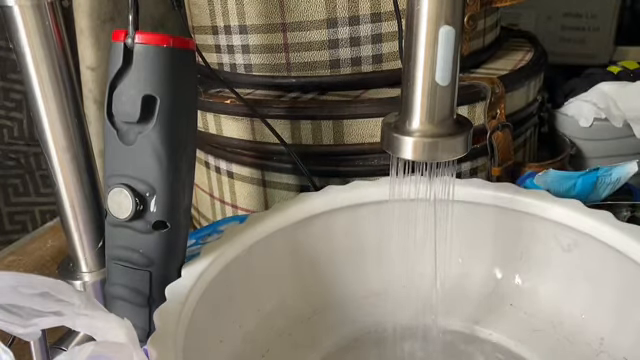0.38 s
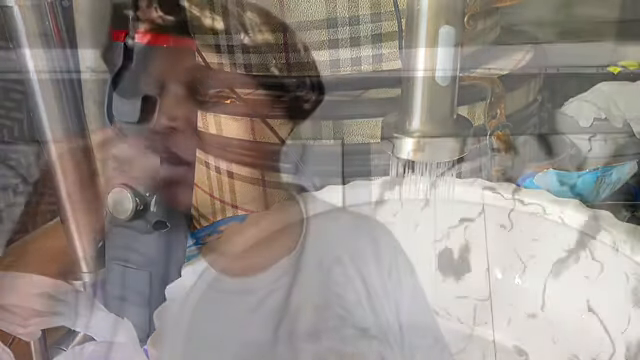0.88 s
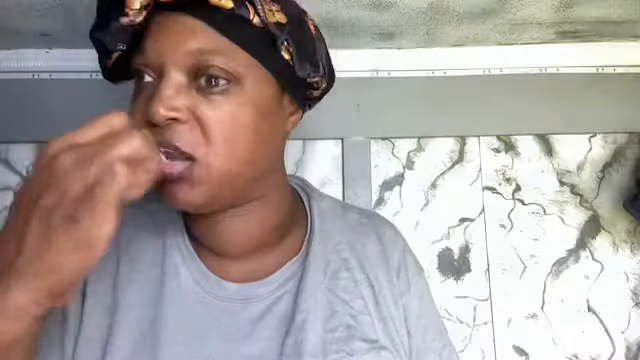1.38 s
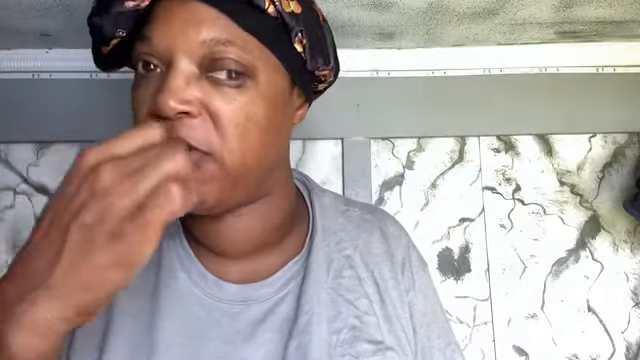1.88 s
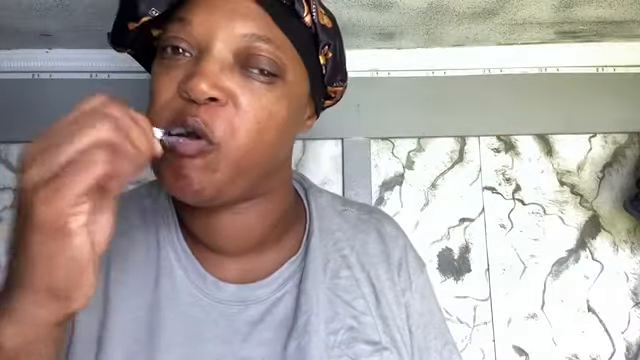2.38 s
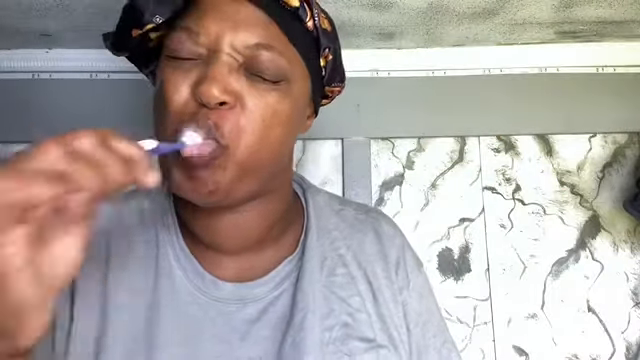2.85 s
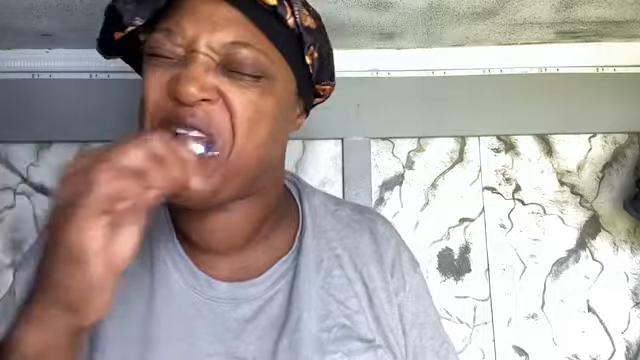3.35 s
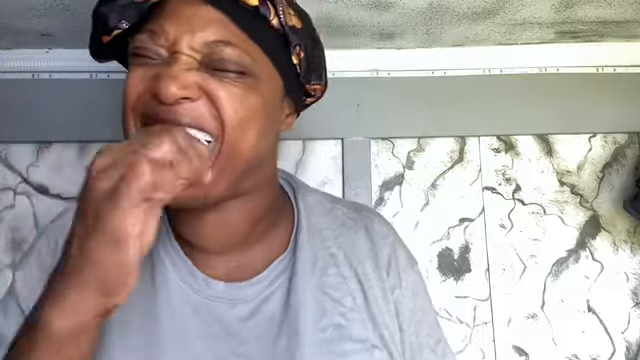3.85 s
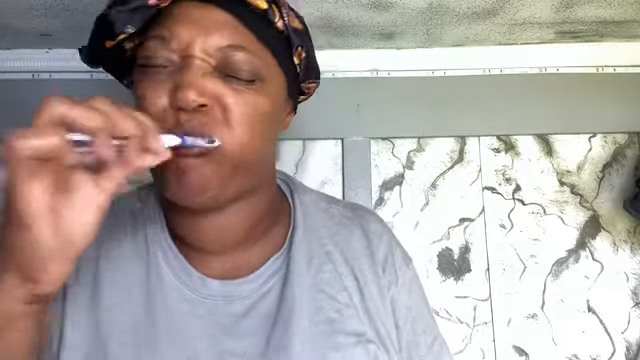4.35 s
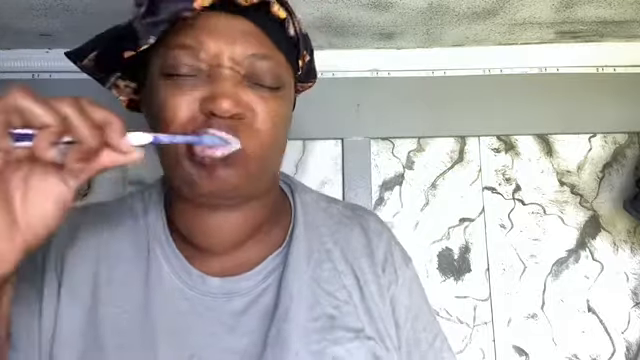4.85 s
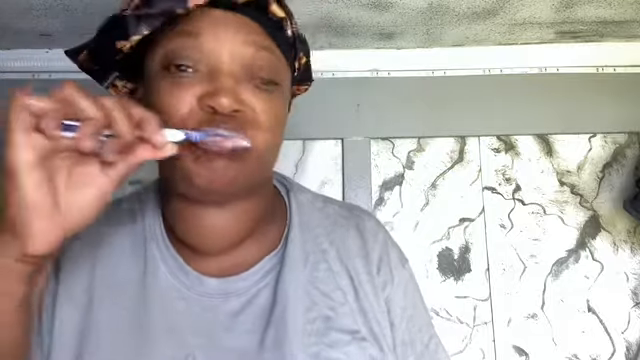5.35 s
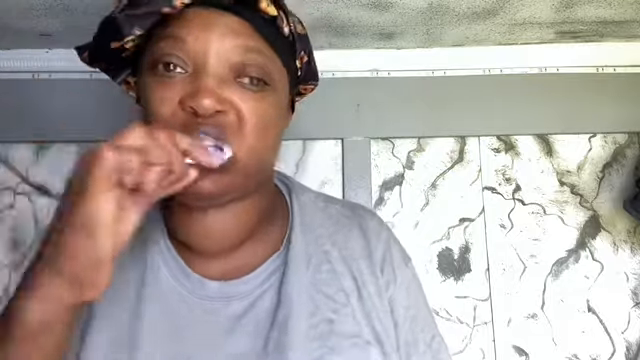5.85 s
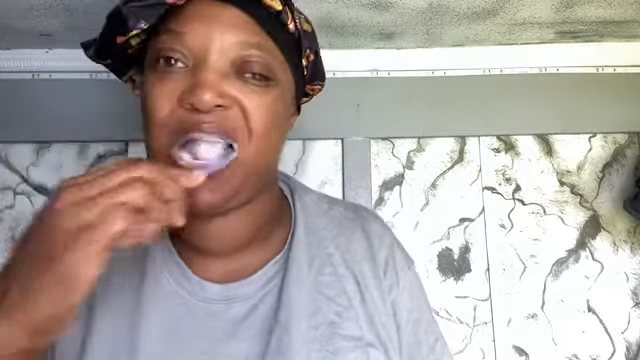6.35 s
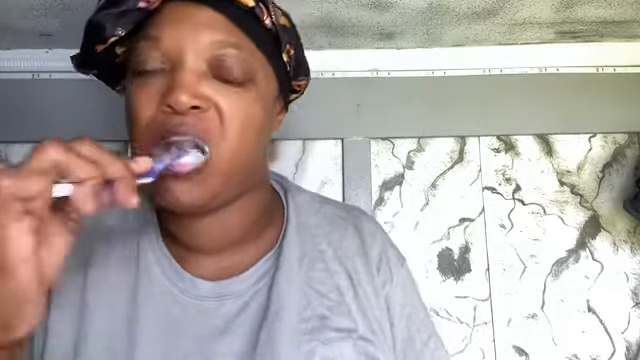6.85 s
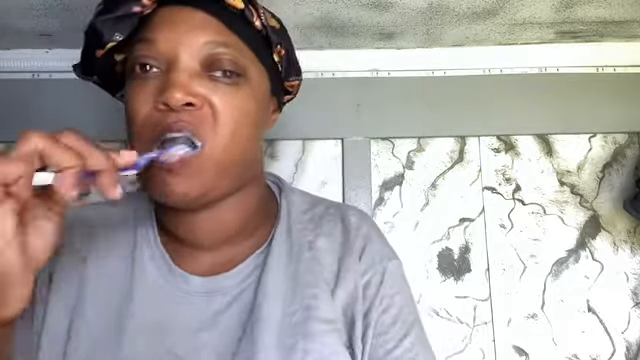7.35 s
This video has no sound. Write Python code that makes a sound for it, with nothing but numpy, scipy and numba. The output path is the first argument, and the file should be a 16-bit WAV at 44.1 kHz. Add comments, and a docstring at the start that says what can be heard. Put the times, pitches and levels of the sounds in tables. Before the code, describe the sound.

A spray tap patters and gurgles into a thin basin, fades after a second, then a toothbrush scrubs teeth in quick strokes over low rumble.

```python
"""A low rumble through the walls fills a cramped cabin throughout: noise swollen by the cabin's low modes.
At first a spray tap plays into a thin basin: spray grains, bubbles, big drops, a drumming bottom and a
low hum, likely the water pump. Brushing off to one side scrubs along, then the water ends and tooth
brushing takes over. Each stroke drags bristles over the teeth: dense slips hiss, ring in the teeth and
sound the mouth cavity, whose pitch follows the lips; knocks and scratches punctuate it."""
import sys
import numpy as np
from scipy import signal
from scipy.fft import rfft, irfft, next_fast_len
from scipy.io import wavfile
from numba import njit

SR = 44100
rng = np.random.default_rng(int(sys.argv[2]) if len(sys.argv) > 2 else 0)


def to_wav(s):
    """Save 16-bit WAV."""
    ch = np.atleast_2d(s).T  # columns
    pcm = np.round(np.clip(ch, -1, 1) * 32767)  # PCM
    wavfile.write(sys.argv[1], SR, pcm.astype(np.int16))


def ratio(d):
    """dB to gain"""
    e = np.asarray(d, float) / 20
    return 10 ** e


N = 340011


def rms_one(x):
    """Scales to rms 1."""
    return x / np.sqrt(np.mean(x ** 2) + 1e-20)


def in_time(s, values):
    """Reads a curve at every sample."""
    return np.interp(np.arange(N) / SR, s, values)


def at_hz(points, hz):
    """Reads a spectrum on a log-frequency axis."""
    points_hz, values = np.transpose(points)
    return np.interp(np.log(hz), np.log(points_hz), values)


def drift(rate_hz):
    """Slow chance with rms 1: noise through two equal real poles, run at SR / 40."""
    r = np.exp(-80 * np.pi * rate_hz / SR)
    white = rng.standard_normal(N // 40 + 2002)
    slow = signal.lfilter([1], [1, -2 * r, r * r], white)[2000:]
    return np.interp(np.arange(N) / 40, np.arange(len(slow)), rms_one(slow))


def resonance(x, hz, width_hz):
    """Two-pole band-pass with gain 1 on top."""
    r = np.exp(-np.pi * width_hz / SR)
    feedback = [1, -2 * r * np.cos(2 * np.pi * hz / SR), r * r]
    return signal.lfilter(np.array([1, 0, -1]) * (1 - r * r) / 2, feedback, x)


def body(x, modes):
    """Resonances in parallel, signs alternating."""
    return sum((-1) ** k * ratio(db) * resonance(x, hz, width_hz)
               for k, (hz, width_hz, db) in enumerate(modes))


@njit
def gliding(x, hz, r, sr):
    """The same band-pass with centre and pole radius that move sample by sample."""
    y = np.zeros(len(x))
    for i in range(2, len(x)):
        r2 = r[i] * r[i]
        drive = (1 - r2) / 2 * (x[i] - x[i - 2])
        y[i] = drive + 2 * r[i] * np.cos(2 * np.pi * hz[i] / sr) * y[i - 1] - r2 * y[i - 2]
    return y


def grains(per_s, spread_db, rows):
    """Random clicks of uneven size and sign; rms 1."""
    born = rng.random((rows, N)) < per_s / SR
    size_db = spread_db * np.minimum(rng.exponential(1, (rows, N)), 5)
    return rms_one(born * ratio(size_db) * rng.choice([-1, 1], (rows, N)))


def spread(mid, side, alike):
    """Left and right with correlation alike, from two unrelated signals."""
    alike = np.clip(alike, -1, 1)
    return np.sqrt((1 + alike) / 2) * mid + np.sqrt((1 - alike) / 2) * side * np.array([[1], [-1]])


def coloured(source, spectrum, likeness, patchy_db, flicker_hz, balance=((1, 0), (2, 0))):
    """Third-octave bands of four noise rows, each with its own level, flicker and stereo spread; rms 1."""
    out = 0
    edges = 20 * 2 ** np.arange(0, 9.9, 1 / 3)
    for k, (low, high) in enumerate(zip(edges, edges[1:])):
        hz = np.sqrt(low * high)
        if spectrum[0][0] / 2 < hz < spectrum[-1][0] * 2:
            sos = signal.butter(2, [low, high], "band", fs=SR, output="sos")
            mid, side = signal.sosfilt(sos, source[k % 2::2])  # neighbouring bands use other rows
            pan = ratio(at_hz(balance, hz) / 2 * np.array([[1], [-1]]))
            gain = ratio(at_hz(spectrum, hz) + patchy_db * drift(flicker_hz))
            out = out + gain * pan * spread(mid, side, at_hz(likeness, hz))
    return rms_one(out)


def pings(events, cycles, half_rise_per_s):
    """Each event rings at its own pitch, falls to 1/e within some cycles and may rise in pitch."""
    out, age = np.zeros(N), np.arange(SR // 20) / SR
    for t, db, hz in events:
        ring = np.sin(2 * np.pi * hz * age * (1 + half_rise_per_s * age))
        out[round(t * SR):][:len(age)] += ratio(db) * np.exp(-age * hz / cycles) * ring
    return out


def cabin(x):
    """Four short feedback delays a side: near, hard walls."""
    t60_s = 0.081
    size = next_fast_len(N + SR // 2)
    turn = -2j * np.pi * np.arange(size // 2 + 1) / size
    lags = rng.uniform(0.0025, 0.011, (2, 4)) * SR
    echoes = ratio(-60 * lags / SR / t60_s)[..., None] * np.exp(turn * lags[..., None])
    response = (echoes / (1 - echoes)).sum(axis=1) / 2
    return irfft(rfft(x, size) * response, size)[:, :N]


def ports(x, from_hz, half_turn_hz):
    """Two spaced microphone ports: above from_hz they part by half a turn of phase per half_turn_hz."""
    size = next_fast_len(N)
    above_hz = np.maximum(np.arange(size // 2 + 1) * SR / size - from_hz, 0)
    turn = np.exp(0.5j * np.pi * above_hz / half_turn_hz * np.array([[1], [-1]]))
    return irfft(rfft(x, size) * turn, size)[:, :N]


# noise spectrum: (frequency [Hz], density [dB per Hz])
RUMBLE_SPECTRUM = [(20, -26), (50, -9), (90, -6), (200, -15.5), (290, -22), (600, -24), (800, -33),
                   (1050, -27.5), (2000, -38.5), (4000, -51), (6500, -52.5), (14500, -60)]
# low air modes: (frequency [Hz], width [Hz], level [dB])
CABIN_MODES = [(66.8, 18.4, -2), (104, 11, -5.5), (122, 17, -9), (399, 21, -9.5)]
# rumble level: (time [s], level [dB])
RUMBLE_LEVEL = [(0.0, -35.5), (0.39, -40), (2.0, -38), (7.71, -39)]
# stereo correlation: (frequency [Hz], left-right likeness [-1..1])
RUMBLE_LIKENESS = [(60, 1), (130, 0.92), (290, 0.085), (2000, 0.066)]
# stereo balance: (frequency [Hz], left minus right [dB])
RUMBLE_BALANCE = [(60, 1.5), (180, 3), (400, -3.5), (1500, 1.5)]


def rumble():
    """Low noise through the walls, swollen by the cabin's low modes."""
    white = rng.standard_normal((4, N))
    swollen = white + ratio(8) * sum(body(white, [mode]) for mode in CABIN_MODES)
    noise = coloured(swollen, RUMBLE_SPECTRUM, RUMBLE_LIKENESS, patchy_db=1.8, flicker_hz=6.1,
                     balance=RUMBLE_BALANCE)
    return noise * ratio(in_time(*np.transpose(RUMBLE_LEVEL)))


def bubbles(per_s, low_hz, high_hz, cycles):
    """Small bubbles at random, dealt to pitches spread over the range; two unrelated rows, rms 1."""
    born, dealt = grains(per_s, 3.0, rows=2), rng.integers(0, 18, N)
    pitches_hz = np.geomspace(low_hz, high_hz, num=18)
    return rms_one(sum(resonance(born * (dealt == k), hz, 0.19 * hz / cycles) * np.sqrt(cycles / hz)
                       for k, hz in enumerate(pitches_hz)))


# spray spectrum: (frequency [Hz], density [dB per Hz])
SPRAY_SPECTRUM = [(300, -47), (1000, -8.5), (2300, -11.5), (3400, -7), (6500, -17), (9100, -14),
                  (12000, -20), (15500, -18)]
# stereo correlation: (frequency [Hz], left-right likeness [-1..1])
SPRAY_LIKENESS = [(600, 0.82), (1400, 0.33), (3100, 0.62), (6000, 0.18), (8500, 1)]


def spray():
    """Jets break into dense grains and small bubbles."""
    jets = coloured(grains(3500, 4.6, rows=4), SPRAY_SPECTRUM, SPRAY_LIKENESS, patchy_db=1.5, flicker_hz=30)
    return jets + ratio(-8) * spread(*bubbles(320, 2530, 5944, cycles=36), 0.24)


# basin modes: (frequency [Hz], width [Hz], level [dB])
BASIN_MODES = [(822, 55, 8.5), (1030, 39, 12.5), (1450, 35, 9)]


def gurgle():
    """Trapped air gurgles in the basin's modes, with lower bubbles."""
    ringing = rms_one(body(grains(500, 4.9, rows=2), BASIN_MODES))
    return spread(*ringing, 0.79) + spread(*bubbles(200, 556, 1810, cycles=9), 0.21)


# basin bottom modes: (frequency [Hz], width [Hz], level [dB])
BOTTOM_MODES = [(68.9, 13.5, -5), (131.3, 26.5, -10), (192, 47, -15)]


def hum_and_drum():
    """A wavering 72 Hz hum, likely the water pump; noise drums on the basin bottom's modes."""
    hum_hz = 72 * (1 + 0.035 * drift(3.93))
    hum = np.sin(2 * np.pi * np.cumsum(hum_hz) / SR)
    white = rng.standard_normal((2, N))
    drumming = rms_one(body(body(white, BOTTOM_MODES), BOTTOM_MODES))
    return hum + ratio(-7.5) * spread(*drumming, 0.98)


# tap levels, an uneven drum and spray that weakens overall: (time [s], spray level [dB], drum level [dB])
TAP_LEVELS = [(0.0, -38.5, -31.5), (0.156, -38.5, -33), (0.194, -39.5, -39), (0.278, -37, -24.5),
              (1.006, -46, -33), (1.1, -50, -49), (1.35, -53, -39.5)]
# big drops: (time [s], level [dB], pitch [Hz])
DROPS = [(0.031, -35.5, 883), (0.159, -32, 1030), (0.183, -19.5, 3340), (0.186, -26.5, 1030),
         (0.204, -29, 1030), (0.238, -51, 1030), (0.273, -30, 4400), (0.296, -24.5, 874),
         (0.302, -29.5, 1004), (0.365, -33.5, 745), (0.388, -26.5, 3900), (0.415, -30, 1370),
         (0.493, -28, 1040), (0.565, -26.5, 5700), (0.644, -31, 810), (0.645, -27, 4040), (0.686, -31, 867),
         (0.726, -29, 4020), (0.758, -26, 1030), (0.855, -31.5, 1030), (0.885, -36.5, 450),
         (0.95, -38, 1030), (1.038, -39.5, 704), (1.041, -31.5, 4530), (1.17, -36, 3050)]


def tap():
    """Spray, gurgle, hum and drumming bottom follow the tap's levels; big drops ring on top."""
    s, spray_db, drum_db = np.transpose(TAP_LEVELS)
    spray_gain = ratio(in_time(s, spray_db))
    drum_gain = ratio(in_time(s, drum_db))
    water = spray() * spray_gain + gurgle() * spray_gain * ratio(-6.5) + hum_and_drum() * drum_gain
    ending = np.clip((s[-1] - np.arange(N) / SR) / 0.16, 0, 1)
    drops = pings(DROPS, cycles=6.8, half_rise_per_s=2.6)
    return water * ending + drops + ratio(-5) * cabin(drops)


# off-axis strokes while the tap runs: (middle [s])
ASIDE_STROKES = [.07, .18, .31, .415, .54, .65, .77]


def brush_aside():
    """A cavity scrub off axis: it reaches the two ports in opposite phase, weaker stroke by stroke."""
    level_db, length_s, cavity_hz = -35.5, 0.032, 1440
    t = np.arange(N) / SR
    strokes = sum(np.exp(-((t - s) / length_s) ** 2 - 1.7 * s ** 2) for s in ASIDE_STROKES)
    rub = grains(3000, 3.5, rows=1)
    scrub = resonance(resonance(rub, cavity_hz, 300), cavity_hz, 500)
    return ratio(level_db) * rms_one(scrub) * strokes * np.array([[1], [-0.8]])


# brush strokes: (middle [s], length [s], hiss level [dB], bite on the teeth over the hiss [dB])
STROKES = [(1.31, 0.3, -63, -9), (1.391, 0.014, -48.5, 0), (1.499, 0.035, -60.5, -13),
           (1.582, 0.037, -52, -18), (1.795, 0.043, -54, -9), (1.882, 0.027, -62, 5.5),
           (1.972, 0.1, -61, -2), (2.028, 0.034, -57.5, 2), (2.059, 0.077, -57, 6.5),
           (2.161, 0.1, -56.5, 2), (2.262, 0.082, -55.5, 0.5), (2.386, 0.11, -53, -5),
           (2.433, 0.049, -72, -5), (2.468, 0.038, -52.5, -24), (2.602, 0.034, -65, 5),
           (2.683, 0.03, -59.5, 5), (2.813, 0.058, -58, 3.5), (2.918, 0.071, -50.5, -19),
           (3.004, 0.047, -57, -29), (3.104, 0.084, -49.5, -34), (3.233, 0.093, -53, -2),
           (3.322, 0.076, -49, 0), (3.436, 0.097, -50.5, 0), (3.539, 0.085, -47.5, -2.5),
           (3.654, 0.083, -51.5, 10), (3.763, 0.092, -46, 0), (3.883, 0.083, -51, 6.5),
           (3.986, 0.084, -45.5, 0), (4.104, 0.11, -52.5, 7), (4.213, 0.083, -54.5, -1.5),
           (4.532, 0.1, -64.5, 0.5), (4.624, 0.066, -65.5, 1.5), (4.759, 0.093, -61.5, -1.5),
           (4.874, 0.078, -59, -9), (4.958, 0.076, -61.5, -5), (5.003, 0.053, -60, 3),
           (5.067, 0.09, -58, -4.5), (5.162, 0.038, -59, -6), (5.213, 0.054, -52, -7),
           (5.279, 0.11, -57.5, -6), (5.403, 0.064, -60, -4), (5.46, 0.076, -59, -20),
           (5.516, 0.057, -56.5, -3), (5.547, 0.022, -46, -12), (5.624, 0.063, -50, 3),
           (5.765, 0.067, -47, 3.5), (5.878, 0.1, -46, 2.5), (5.986, 0.092, -49, 2), (6.107, 0.1, -48, 0),
           (6.216, 0.068, -47.5, -1), (6.336, 0.11, -52.5, -4.8), (6.446, 0.08, -50.5, 0),
           (6.567, 0.089, -50, -1.5), (6.667, 0.066, -51.5, 0.5), (6.78, 0.091, -53.5, 3),
           (6.891, 0.083, -53, 5), (7.023, 0.11, -54.5, 6), (7.133, 0.07, -51.5, 0.5),
           (7.256, 0.093, -56.5, 9), (7.374, 0.087, -54.5, 1.5), (7.502, 0.1, -53, 1.5),
           (7.601, 0.065, -50.5, -5.5), (7.7, 0.057, -55, -14.5)]


def pressure(levels_db, squareness, share):
    """Each stroke swells and stops, peaking later if the bite exceeds the hiss; share scales its length."""
    out, t = np.zeros(N), np.arange(N) / SR
    for (middle, length, _, bite_db), db in zip(STROKES, levels_db):
        near = slice(int((middle - 0.2) * SR), int((middle + 0.2) * SR))
        rise = 0.65 if bite_db > 0 else 0.45  # part of the stroke spent swelling
        age = t[near] - middle - (rise - 0.5) * length
        side_s = share * length * np.where(age < 0, rise, 1 - rise)
        out[near] += ratio(db) * np.exp(-np.abs(age / side_s) ** squareness)
    return out


# mouth as the lips shape it: (time [s], cavity pitch [Hz], cavity level over the scrub [dB])
MOUTH = [(1.3, 1190, 7.5), (1.6, 920, 2), (1.85, 1030, 16), (1.98, 1200, 2.5), (2.18, 1065, 7),
         (2.29, 990, 10), (2.35, 1030, 6), (2.391, 820, 5), (2.41, 636, 30), (2.47, 540, -9),
         (2.6, 1000, 8.5), (2.67, 1030, -5), (3.27, 990, 6), (3.29, 1444, 14.5), (3.76, 1430, 9),
         (4.0, 1330, 7.5), (4.17, 1340, 11.5), (4.25, 1140, 19.5), (4.54, 1030, -3), (5.56, 1050, -2),
         (5.6, 1970, -3), (5.95, 1960, -10.5), (6.02, 1780, 9), (6.07, 1240, -2.5), (6.22, 1330, 10),
         (6.37, 1450, 11), (6.48, 1330, 11), (6.54, 1900, 9), (6.6, 1250, 7), (6.7, 1370, 18.5),
         (6.745, 1450, 10.5), (6.82, 1100, 13.5), (6.9, 1190, 6), (7.26, 1110, 10), (7.5, 1030, 8.5),
         (7.63, 1030, 4.5), (7.68, 655, 21)]


def mouth_at(s):
    """Cavity pitch and level at given times."""
    times, hz, db = np.transpose(MOUTH)
    return np.interp(s, times, hz), np.interp(s, times, db)


def lips():
    """Cavity pitch in Hz: scaled less at each stroke's end as the brush slides in, never quite still."""
    s, length = np.transpose(STROKES)[:2]
    times = np.ravel([s - 0.28 * length, s + 0.4 * length], order="F")  # start, end, start, ..
    pitches_hz = mouth_at(times)[0] * np.tile([1.054, 1.019], len(s))
    return in_time(np.maximum.accumulate(times), pitches_hz) * (1 + 0.045 * drift(14))


def cavity(x, lips_hz, times, width_hz):
    """Mouth resonance at a multiple of the lip pitch; wider lips raise it and damp it more."""
    opening = (lips_hz / 1510) ** 1.38  # 1 at 1510 Hz
    return gliding(x, times * lips_hz, np.exp(-np.pi * width_hz * opening / SR), SR)


# bristles catch and flick free: (time [s], peak level [dB])
SCRATCHES = [(1.664, -35.5), (2.689, -28.5), (3.007, -39), (3.6694, -44), (3.8806, -30), (4.1853, -28),
             (4.996, -33), (5.208, -31), (5.252, -32), (5.4408, -33), (5.5402, -42), (5.6047, -34),
             (6.425, -43), (6.871, -28)]


def scratches(noise):
    """Each catch is a sudden burst of the given noise that dies fast."""
    decay_s, rms_under_peak_db = 0.0059, -22.5
    out, age = np.zeros(N), np.arange(SR // 20) / SR
    for t, db in SCRATCHES:
        out[round(t * SR):][:len(age)] += ratio(db + rms_under_peak_db) * np.exp(-age / decay_s)
    return noise * out


# hiss spectrum: (frequency [Hz], density [dB per Hz])
HISS_SPECTRUM = [(800, 1), (3000, -0.5), (5000, -0.5), (6600, 3), (8800, -0.5), (11500, -2.5),
                 (14300, -8.5), (16000, -14)]
# stereo correlation: (frequency [Hz], left-right likeness [-1..1])
HISS_LIKENESS = [(1400, 0.91), (4000, 0.69), (6500, 0.47), (9000, 1)]


def bristle_hiss(hiss_db):
    """Dense bristle slips come in bunches, tooth by tooth."""
    slips = grains(6000, 2.66, rows=4)
    bunches = ratio(2.2 * drift(80))
    bristles = coloured(slips, HISS_SPECTRUM, HISS_LIKENESS, patchy_db=2.2, flicker_hz=25)
    return bristles * pressure(hiss_db, 2.27, share=0.85) * bunches + scratches(bristles)


# tooth modes: (frequency [Hz], width [Hz], level [dB])
TEETH_MODES = [(1920, 1100, 4.5), (3143, 506, 9), (3990, 340, 6.5), (4780, 310, -0.5), (5460, 380, -4),
               (6800, 200, 0)]
# front teeth ring higher: (time [s], gain of the upper modes [dB])
FRONT_TEETH = [(1.3, -2.5), (4.5, -5), (4.9, 3.5), (6.1, 8), (6.4, 3.5), (7.7, -3)]


def teeth_ring(rub, lips_hz, teeth_db):
    """The rub excites flickering tooth modes and a higher mode of the mouth cavity."""
    front_db = in_time(*np.transpose(FRONT_TEETH))
    enamel = 0
    for k, mode in enumerate(TEETH_MODES):
        hz, width_hz, _ = mode
        gain = (-1) ** k * ratio(0.72 * drift(35) + (k > 1) * front_db)
        enamel = enamel + gain * resonance(body(rub, [mode]), hz, 2 * width_hz)
    overtone = cavity(cavity(rub, lips_hz, 1.54, 450), lips_hz, 1.7, 640)
    enamel = rms_one(enamel + ratio(-4) * overtone)
    return enamel * pressure(teeth_db, 2.37, share=0.77) + ratio(5.5) * scratches(enamel)


def mouth_cavity(rub, lips_hz, mouth_db):
    """The rub sounds the cavity shaped by the lips and a pocket in the cheeks that does not move."""
    moving = cavity(cavity(rub, lips_hz, 1, 210), lips_hz, 1, 500)
    cheeks = resonance(rub, 1151, 87)
    return rms_one(moving + ratio(-7) * cheeks) * pressure(mouth_db + 0.1, 2.8, share=0.85)


# brush head knocking a tooth: (time [s], level [dB])
KNOCKS = [(1.393, -30.5), (1.587, -44), (1.791, -41.5), (1.887, -34), (2.095, -33.5), (2.347, -37),
          (3.316, -35), (3.615, -32), (3.646, -26), (3.753, -27), (4.183, -33), (5.539, -42), (6.675, -19),
          (6.909, -22), (7.155, -26.5)]


def tooth_knocks(lips_hz):
    """Short pings at the cavity pitch that also ring the cavity and tick in the teeth."""
    knocks = pings([(t, db, mouth_at(t)[0]) for t, db in KNOCKS], cycles=1.6, half_rise_per_s=0)
    tick = ratio(-9) * body(knocks, TEETH_MODES)
    return knocks + ratio(-3) * cavity(knocks, lips_hz, 0.975, 100) + tick


def brush():
    """Hiss, teeth, mouth and knocks add up; a near hard surface and the cabin echo them."""
    s, _, hiss_db, bite_db = np.transpose(STROKES)
    mouth_db = hiss_db + 0.62 * bite_db + mouth_at(s)[1]  # a harder bite sounds the cavity more
    lips_hz = lips()
    hiss = bristle_hiss(hiss_db)
    rub = grains(3000, 3.02, rows=2) * ratio(2.6 * drift(60))
    teeth = teeth_ring(rub[0], lips_hz, hiss_db + bite_db)
    close = teeth + mouth_cavity(rub[1], lips_hz, mouth_db) + tooth_knocks(lips_hz)
    direct = (hiss + close) * ratio([[0.8], [-0.8]])
    heard = direct + ratio(-3.5) * cabin(close + resonance(hiss[0], 2800, 5200))
    lag = round(SR / 920)  # comb peaks 920 Hz apart
    return heard + ratio(-9) * np.pad(heard, ((0, 0), (lag, 0)))[:, :N]


def scene():
    """Tap and brush through the ports, with the rumble and the brushing aside."""
    water = ports(tap(), from_hz=7220, half_turn_hz=1900)
    brushing = ports(brush(), from_hz=7940, half_turn_hz=2520)
    return water + brushing + rumble() + brush_aside()


def band_limit(x):
    """A steep low-pass at the top of the band."""
    return signal.sosfilt(signal.butter(12, 17040, fs=SR, output="sos"), x)


def record(dry):
    """Delivers the finished mix."""
    return band_limit(dry)


dry = scene()
out = record(dry)
to_wav(out)
```